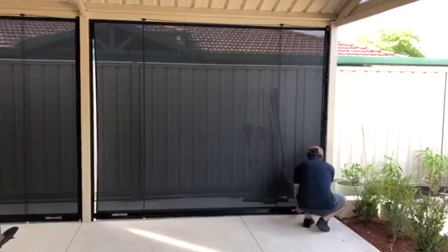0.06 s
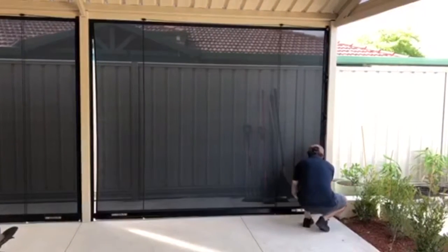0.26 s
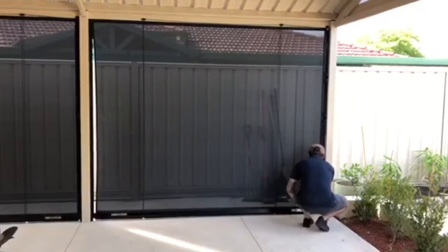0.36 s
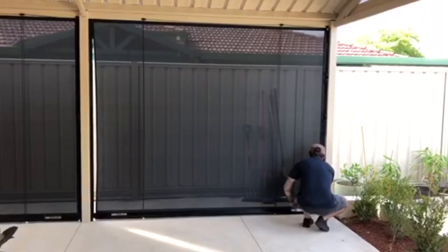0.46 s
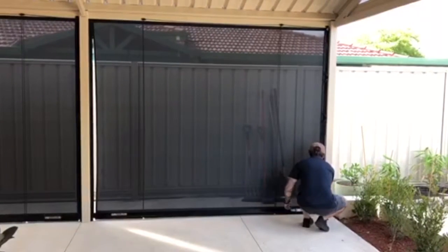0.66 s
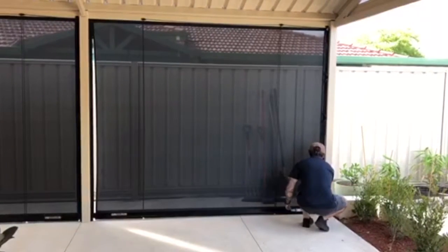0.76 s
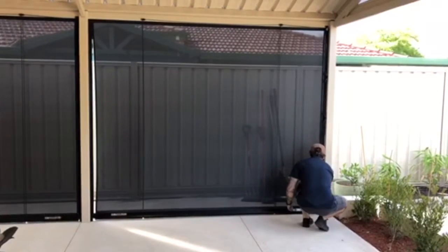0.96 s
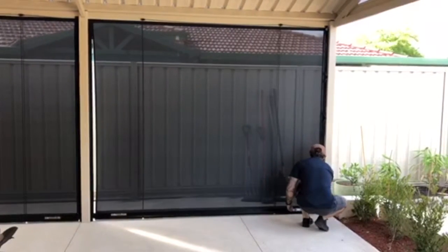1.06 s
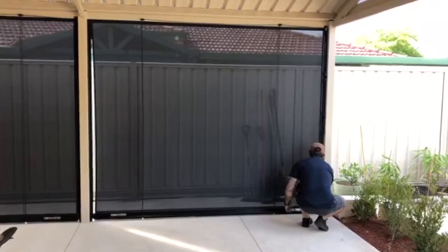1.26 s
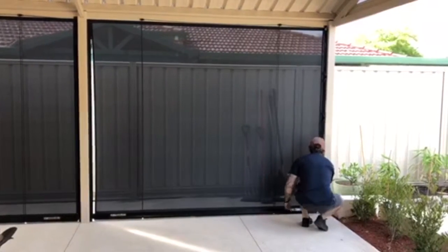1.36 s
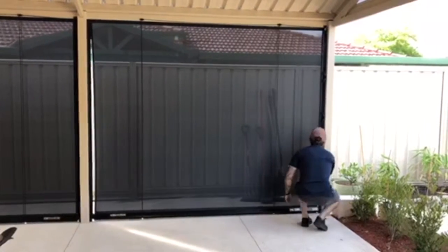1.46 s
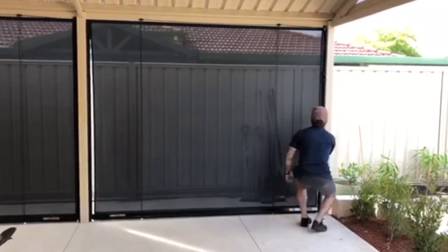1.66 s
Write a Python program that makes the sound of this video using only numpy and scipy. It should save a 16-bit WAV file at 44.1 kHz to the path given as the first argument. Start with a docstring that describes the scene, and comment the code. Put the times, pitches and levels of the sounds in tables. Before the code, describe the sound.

On a covered patio, a blind locks with one loud metallic clack that rings in its rail. The catch clicks, the rail knocks and a hand taps softly, before a small motor starts with a quiet rush and rising whine.

```python
"""On a patio, a blind's bolt slides and its lock snaps with a metal clack that chatters and rings in the rail.
The catch clicks, the hollow bottom rail knocks home, a hand taps it softly and the lock tinks when let go.
Each blow is a sharp contact and a burst of chatter from loose parts, answered by roof and fence.
Over a low hum and outdoor air, a small motor spins up with a rush, a whine and a brief growl."""
import sys
import numpy as np
from scipy import signal
from scipy.fft import rfft, irfft
from scipy.io import wavfile
from scipy.ndimage import uniform_filter1d

SR = 44100
rng = np.random.default_rng(int(sys.argv[2]) if len(sys.argv) > 2 else 0)


def bounce(signal):
    """Save signal as a 16-bit WAV file at the path given by the first command-line argument."""
    frames = np.transpose(np.atleast_2d(signal))
    limited = np.clip(frames, -1, 1)
    pcm = np.round(limited * 32767).astype(np.int16)
    wavfile.write(sys.argv[1], SR, pcm)


N = 74970
T_S = np.arange(N) / SR


def undb(db):
    return 10 ** (np.asarray(db) / 20)


def unit(x):
    """Scale to rms 1."""
    return x / np.sqrt(np.mean(x ** 2))


def curve(points):
    """Join (t/s, value) points by straight lines."""
    return np.interp(T_S, *np.array(points).T)


def at_hz(points, hz):
    """Read (f/Hz, value) points on a log-frequency axis."""
    f, values = np.array(points).T
    return np.interp(np.log(np.maximum(hz, 1)), np.log(f), values)


def colour(x, points):
    """Minimum-phase filter with the given (f/Hz, gain/dB) response."""
    size = 2 * N
    gain = undb(at_hz(points, np.fft.rfftfreq(size, 1 / SR)))
    cepstrum = irfft(np.log(gain))
    cepstrum[1:N] *= 2
    cepstrum[N:] = 0
    return irfft(rfft(x, size) * np.exp(rfft(cepstrum)))[:N]


def noise(points):
    """Coloured noise, rms 1."""
    return unit(colour(rng.standard_normal(N), points))


def peak(hz, centre_hz, width_hz):
    """Resonance curve, height 1."""
    return 1 / (1 + (2 * (hz - centre_hz) / width_hz) ** 2)


def narrow(hz, width_hz):
    """Noise in one resonance, rms 1."""
    f = np.fft.rfftfreq(N, 1 / SR)
    return unit(irfft(rfft(rng.standard_normal(N)) * peak(f, hz, width_hz), N))


def walk(rate_hz):
    """Smooth random drift, rms 1."""
    hold = int(SR / rate_hz)
    steps = np.repeat(rng.standard_normal(N // hold + 1), hold)
    return unit(uniform_filter1d(uniform_filter1d(steps, hold), hold)[:N])


def delay(x, at_s):
    return np.concatenate([np.zeros(int(at_s * SR)), x])[:N]


def decay(t60_s):
    return np.exp(-np.log(1000) * T_S / t60_s)


def swell(rise_s):
    return 1 - np.exp(-(T_S / rise_s) ** 2)


def bump(at_s, spread_s):
    return np.exp(-.5 * ((T_S - at_s) / spread_s) ** 2)


def mode(hz, t60_s):
    """One struck mode, random phase."""
    return np.sin(2 * np.pi * (hz * T_S + rng.random())) * decay(t60_s)


# hum tones: f/Hz, relative level/dB
HUM_TONES = [(97.8, 0), (196.4, -8.5), (135, -10), (64.6, -11)]
# hum envelope: t/s, level/dB
HUM_DB = [(0, -59), (.17, -51), (.35, -52), (.42, -57), (.72, -51), (1.0, -60), (1.21, -51), (1.33, -57),
          (1.45, -52), (1.7, -50.5)]
# air spectrum: f/Hz, relative level/dB
AIR_COLOUR = [(20, -54), (35, -13), (60, -11), (110, -9), (165, -8.5), (230, -13), (420, -17.5),
              (600, -18.5), (950, -16.5), (2000, -27.5), (5000, -32.5), (9000, -38.5), (16000, -52)]
def outdoors(waver_db=1.3, air_db=-54.5):
    """A wavering low hum over distant outdoor noise."""
    hum = 0
    for hz, db in HUM_TONES:
        amplitude = np.sqrt(2) * undb(db + waver_db * walk(13.66))
        hum += amplitude * np.sin(2 * np.pi * hz * T_S + .14 * walk(13))
    air = undb(air_db + .28 * walk(8.7)) * noise(AIR_COLOUR)
    return hum * undb(curve(HUM_DB)) + air


# scrape spectrum: f/Hz, relative level/dB
SLIDE_COLOUR = [(150, 3), (600, 1), (1200, 14.5), (2200, 0), (5000, -4), (15000, -27)]
def bolt(level_db=-39.5, rise_s=.019):
    """The sliding bolt scrapes, louder until the lock snaps."""
    ahead_s = CLACKS[0][0] - T_S
    envelope = np.exp(-np.abs(ahead_s) / rise_s) * (ahead_s > 0)
    return undb(level_db) * noise(SLIDE_COLOUR) * envelope


# reverberation under the roof: f/Hz, t60/s
PATIO_T60 = [(150, 0.69), (600, 0.72), (1400, 0.61), (3000, 0.59), (5500, 0.5), (8000, .42), (15000, 0.31)]
def patio():
    """Diffuse echo of roof and fence, energy 1; the treble dies first."""
    f = np.fft.rfftfreq(N, 1 / SR)
    centres_hz, t60s = zip(*PATIO_T60)
    spectrum, echo = rfft(rng.standard_normal(N)), 0
    for t60_s, weights in zip(t60s, np.eye(len(t60s))):
        band = at_hz(list(zip(centres_hz, weights)), f)
        echo += irfft(spectrum * band, N) * decay(t60_s)
    return unit(echo * swell(rise_s=.014)) / np.sqrt(N)


def blows(rows, tone, lag_s, spread_s, echo_db, tilt=None, contact_s=.0012, rattles_per_s=2400):
    """Each blow: a sharp contact, chatter of loose parts peaking lag_s later, and the patio's echo."""
    out = 0
    for at_s, db, chatter_db in rows:
        contact = unit(rng.choice([-1., 1.], N) * np.exp(-T_S / contact_s))
        if tilt is not None:
            contact = colour(contact, tilt)
        rattle = rng.standard_normal(N) * (.3 + (rng.random(N) < rattles_per_s / SR))
        chatter = undb(chatter_db) * unit(rattle * bump(lag_s, spread_s))
        echo = undb(echo_db) * np.hypot(1, undb(chatter_db)) * patio()
        out += undb(db) * delay((contact + chatter) / np.sqrt(N) + echo, at_s)
    return colour(out, tone)


# lock blows: t/s, relative level/dB, chatter re contact/dB
CLACKS = [(0.2040, -1.5, 4)]
# clack spectrum: f/Hz, gain/dB
CLACK_COLOUR = [(100, -16.5), (300, -13), (650, -2), (1350, 1), (2300, -0.5), (3800, -1.5), (5000, 3),
                (6500, -4), (8200, -4), (10000, -8), (12000, -8.5), (16000, -17)]
# extra colour of a metal-on-metal contact: f/Hz, gain/dB
METAL_TILT = [(500, -27), (1400, 0), (3000, -6), (5000, 2.5), (8200, 3.5), (11000, 0.5), (16000, -3)]
def lock():
    """The lock snaps, metal on metal, and chatters in its rail."""
    return undb(8.5) * blows(CLACKS, CLACK_COLOUR, lag_s=.011, spread_s=.0056, echo_db=-3, tilt=METAL_TILT)


# modes of lock and rail: f/Hz, relative level/dB, t60/s
RAIL_MODES = [(648, -6, .4), (1145, -4, .4), (1315, -4, .6), (1415, -3, .5), (1868, -4, .45),
              (2978, -4, .55), (3240, -1, .6), (4498, 0, .35), (4878, -3, .45), (5061, -2, .45),
              (5200, -3, .45), (5517, -3, .45), (6052, -2, .42), (7607, -6, .3), (8080, -4, .3)]
# close spring modes: f/Hz, relative level/dB
SPRING_MODES = [(11565, -5), (11605, -3), (11682, 0), (11790, -7)]
def rail_and_spring(ring_db=-33.5, ping_db=-36, strike_db=11, strike_s=.006):
    """The snap leaves the rail ringing; the spring's modes beat in a thin ping."""
    out = 0
    for at_s, blow_db, _ in CLACKS:
        ring = sum(undb(db) * mode(hz, t60_s) * (1 + .12 * walk(30)) for hz, db, t60_s in RAIL_MODES)
        ping = sum(undb(db) * mode(hz, t60_s=.36) * (1 + .5 * walk(144)) for hz, db in SPRING_MODES)
        ping *= undb(strike_db * np.exp(-T_S / strike_s))
        out += undb(blow_db) * delay(undb(ring_db) * ring + undb(ping_db) * ping, at_s)
    return out


# catch clicks: t/s, relative level/dB, chatter re contact/dB
CLICKS = [(0.5412, -19, 8)]
# click spectrum: f/Hz, gain/dB
CLICK_COLOUR = [(300, -27), (1500, -7), (3000, -6.5), (5000, -10), (7600, -4), (10500, -9), (13000, -13),
                (16000, -18)]
def catch():
    """The metal catch clicks lightly."""
    return undb(5) * blows(CLICKS, CLICK_COLOUR, lag_s=.01, spread_s=.0062, echo_db=-3, tilt=METAL_TILT)


# hand taps: t/s, relative level/dB, chatter re contact/dB
TAPS = [(0.628, -23, 5.5), (0.800, -39.5, 12), (0.908, -35.5, 5), (1.080, -41.5, 12), (1.292, -41, 7.5)]
# tap spectrum: f/Hz, gain/dB
TAP_COLOUR = [(200, -20), (900, 1.5), (1600, 1.5), (2200, 3), (3500, -2.5), (5500, -2), (9000, -11.5),
              (16000, -32)]
def hand():
    """A hand taps softly on the rail."""
    return undb(3.5) * blows(TAPS, TAP_COLOUR, lag_s=.01, spread_s=.0074, echo_db=-.5)


# bottom rail knocks: t/s, relative level/dB, chatter re contact/dB
KNOCKS = [(0.6627, -24.5, 12.5)]
# knock spectrum: f/Hz, gain/dB
KNOCK_COLOUR = [(200, -27), (550, -9), (950, 2.5), (1250, 1.5), (1750, 6.5), (2200, 0), (2900, -8.5),
                (3500, -1), (4400, -8.5), (6300, -5.5), (9000, -23), (16000, -37)]
# hollow rail resonances: f/Hz, width/Hz, level/dB, t60/s
HOLLOW_MODES = [(1700, 310, -33, 0.083), (3400, 170, -51.5, 0.36)]
def bottom_rail():
    """The hollow bottom rail knocks home and rings briefly."""
    out = undb(5.5) * blows(KNOCKS, KNOCK_COLOUR, lag_s=.0085, spread_s=.0045, echo_db=-1)
    for at_s, _, _ in KNOCKS:
        ring = sum(undb(db) * narrow(hz, width_hz) * decay(t60_s)
                   for hz, width_hz, db, t60_s in HOLLOW_MODES)
        out += delay(ring * swell(rise_s=.005), at_s)
    return out


def lock_tink():
    """The lock rings faintly when let go."""
    return undb(-70) * delay(narrow(hz=9000, width_hz=110) * decay(t60_s=.7), at_s=.88)


# rush spectrum before the low-pass: f/Hz, relative level/dB
RUSH_COLOUR = [(100, -13), (250, -3.5), (550, -11), (1000, -3), (2000, 1.5), (3200, -3), (5500, -0.5),
               (9000, -1.5), (12000, -8.5), (16000, -6.5)]
# rush envelope: t/s, relative level/dB
RUSH_DB = [(1.355, -85), (1.385, -53.5), (1.43, -51.5), (1.50, -46), (1.56, -45), (1.70, -42.5)]
def rush(motor_hz, cutoff_ratio=31):
    """Noise that brightens with motor speed."""
    f, frame_s, frames = signal.stft(noise(RUSH_COLOUR), SR)
    cutoff_hz = cutoff_ratio * np.interp(frame_s, T_S, motor_hz)
    lowpassed = signal.istft(frames / np.hypot(1, f[:, None] / cutoff_hz), SR)[1][:N]
    return lowpassed * undb(curve(RUSH_DB))


# whine partials: harmonic number, relative level/dB
WHINE_PARTIALS = [(1, -3.5), (2, -3.5), (3, -4), (4, -5), (5, -13), (6, -14)]
# housing resonances: f/Hz, width/Hz, lift/dB
HOUSING_MODES = [(858, 24, 8), (1342, 26, 8), (1668, 50, 6), (2545, 80, 6)]
# whine envelope: t/s, relative level/dB
WHINE_DB = [(1.36, -85), (1.41, -54), (1.51, -52), (1.545, -47.5), (1.62, -47), (1.70, -45)]
def whine(motor_hz, phase, flutter_db=2.2, echo_db=-4):
    """Partials climb through the housing's resonances and beat with their echo."""
    direct = 0
    for k, db in WHINE_PARTIALS:
        lift_db = sum(top_db * peak(k * motor_hz, hz, width_hz) for hz, width_hz, top_db in HOUSING_MODES)
        direct += undb(db + lift_db + flutter_db * walk(110)) * np.sin(k * phase + .5 * walk(90))
    direct *= undb(curve(WHINE_DB))
    return direct + undb(echo_db) * signal.fftconvolve(direct, patio())[:N]


# growl partials: harmonic number, relative level/dB
GROWL_PARTIALS = [(1, -1), (3, -4), (4, -1), (5, -4), (7, -5)]
def growl(phase, jitter_rad=1.7):
    """Rough low harmonics as the motor takes up speed."""
    partials = sum(undb(db) * np.sin(k * phase + jitter_rad * walk(120)) for k, db in GROWL_PARTIALS)
    return undb(-52) * partials * bump(at_s=1.442, spread_s=.028)


# motor speed: t/s, f/Hz
MOTOR_HZ = [(1.37, 109.7), (1.42, 224.5), (1.46, 293.6), (1.50, 352.7), (1.55, 410.8), (1.60, 425.2),
            (1.65, 441), (1.70, 449)]
def motor(wobble=.012):
    """A small motor spins up; its speed drives rush, whine and growl."""
    hz = curve(MOTOR_HZ)
    phase = 2 * np.pi * np.cumsum(hz * (1 + wobble * walk(130))) / SR
    return rush(hz) + whine(hz, phase) + growl(phase)


def scene():
    blind = bolt() + lock() + rail_and_spring() + catch() + hand() + bottom_rail() + lock_tink()
    return (outdoors() + blind + motor())[None]


def record(dry, low_hz=38, top_hz=16000):
    """Cut the deepest rumble and the top."""
    thin = signal.sosfilt(signal.butter(4, low_hz, "high", fs=SR, output="sos"), dry)
    return signal.sosfilt(signal.ellip(10, .2, 80, top_hz, fs=SR, output="sos"), thin)


dry = scene()
out = record(dry)
bounce(out)
```